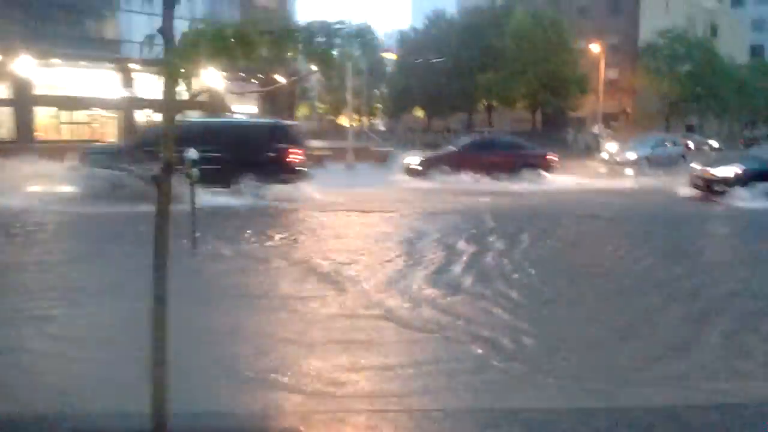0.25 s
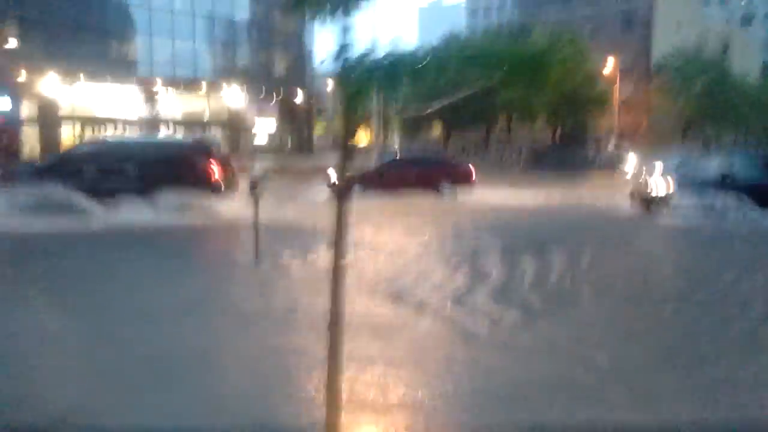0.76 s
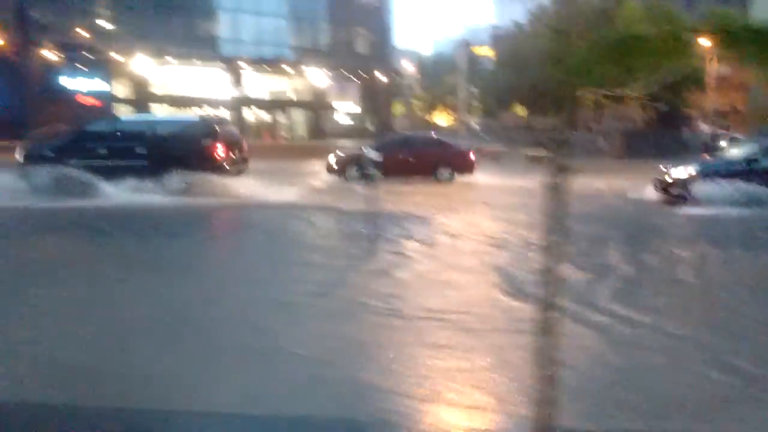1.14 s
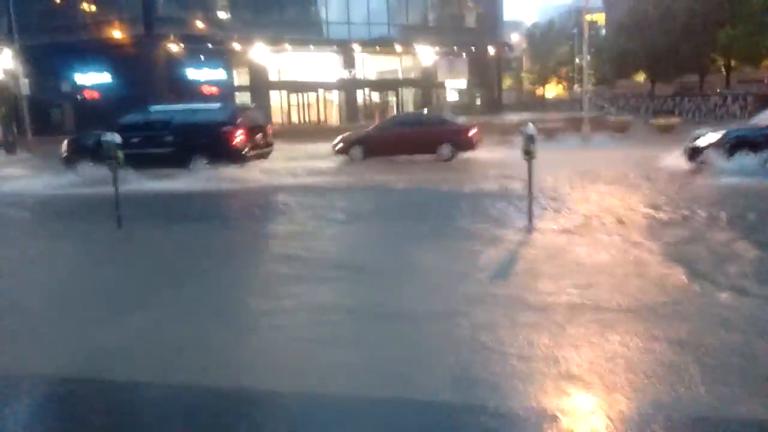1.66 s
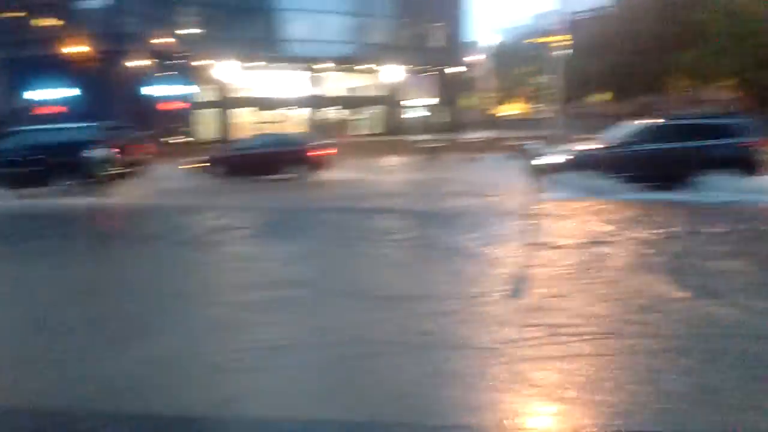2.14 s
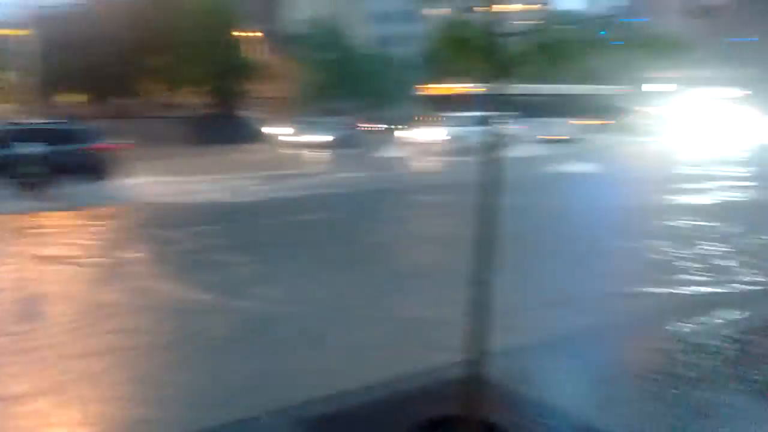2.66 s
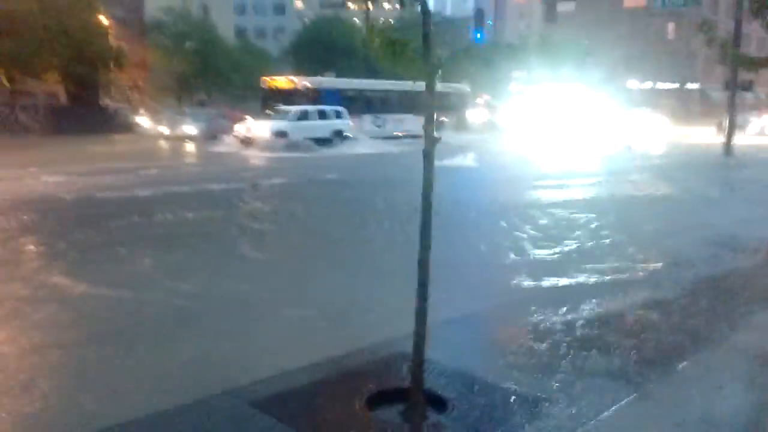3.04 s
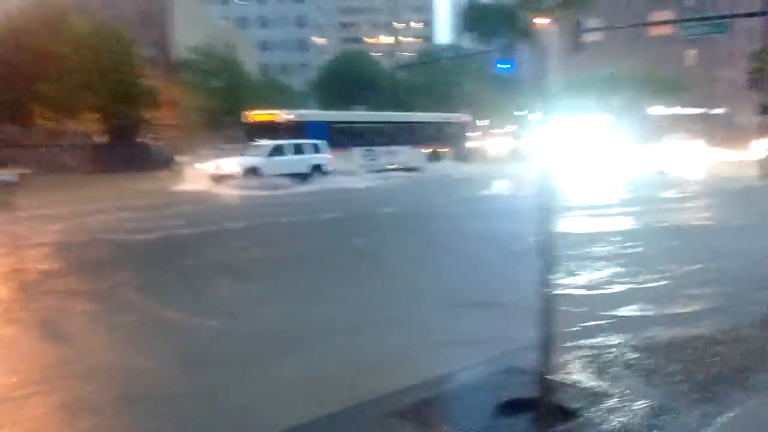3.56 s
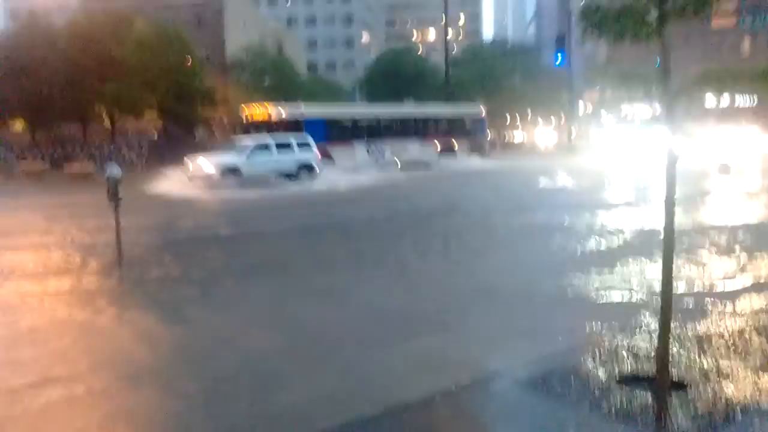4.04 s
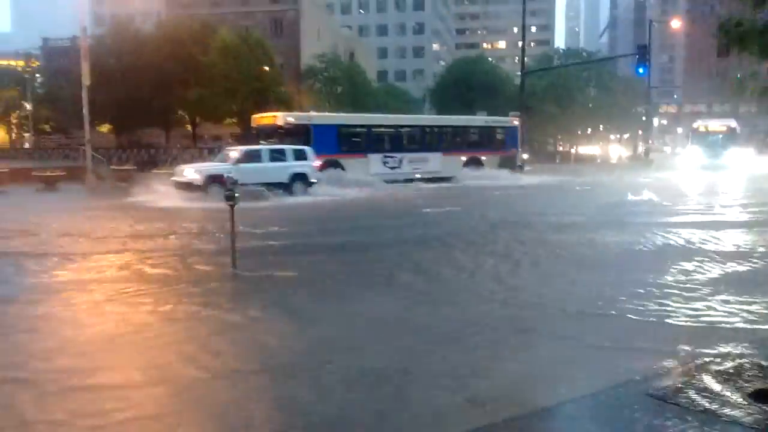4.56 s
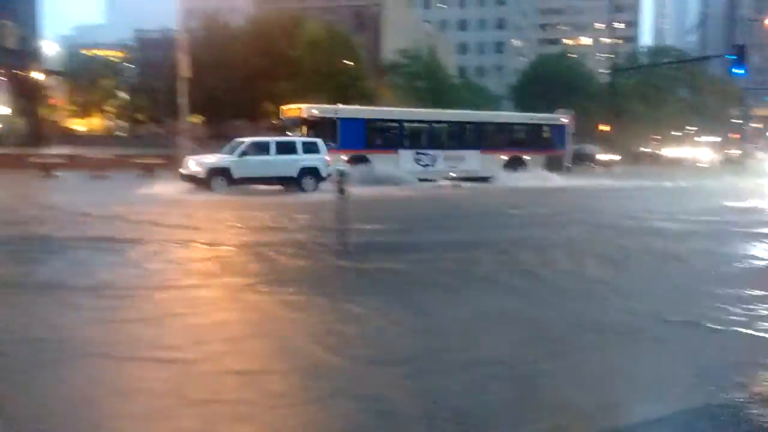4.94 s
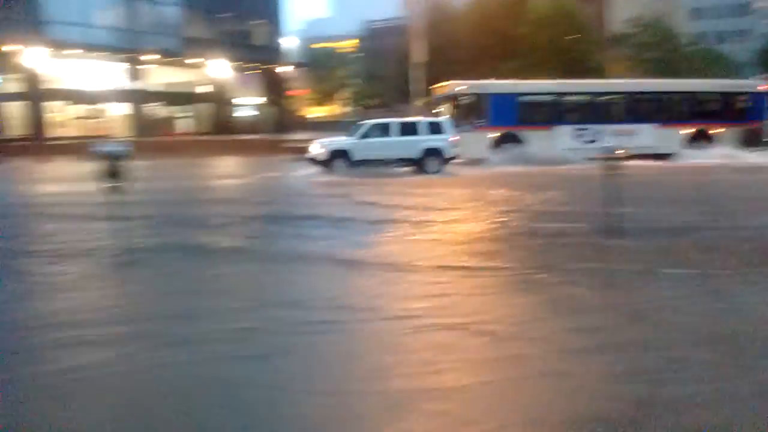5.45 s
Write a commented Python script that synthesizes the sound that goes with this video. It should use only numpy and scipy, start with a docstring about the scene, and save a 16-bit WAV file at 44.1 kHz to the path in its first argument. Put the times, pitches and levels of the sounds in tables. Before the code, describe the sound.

Heavy rain hisses and bubbles over a flooded city street as cars push through the water, engines droning low and big drops ticking close by.

```python
"""Heavy rain hisses and bubbles on a flooded street, swelling as cars shove through the water; low engines drone
and big drops tick close by. Rain is random impulses, hiss and ringing bubbles; wash and rumble are shaped noise;
engines are wavering sine pairs; thumps and ticks are dying sines. A handheld recorder hears it through a port
at each end, the right one wired in reverse; its gain control ducks on loud peaks and creeps back."""
import sys
import numpy as np
from scipy import signal
from scipy.fft import rfft, irfft, next_fast_len
from scipy.io import wavfile
from scipy.ndimage import minimum_filter1d

SR = 44100
rng = np.random.default_rng(int(sys.argv[2]) if len(sys.argv) > 2 else 0)


def unload_audio(sound):
    """Save the sound as a 16-bit wav file, at the path given as the first command line argument."""
    columns = np.transpose(np.atleast_2d(sound))
    # keep every value between -1 and 1, then stretch to whole-number steps
    steps = np.round(np.clip(columns, -1, 1) * 32767)
    wavfile.write(sys.argv[1], SR, steps.astype(np.int16))


N = 250929
SIZE = next_fast_len(N + 4096)
HZ = np.maximum(np.arange(SIZE // 2 + 1) * SR / SIZE, 1)
PORT_LAG_S = 0.000323   # sound travel from one end of the recorder to the other


def from_db(db):
    """Gain of a level in dB."""
    return 10 ** (np.asarray(db) / 20)


def rms_one(x):
    """x scaled to rms 1."""
    return x / np.sqrt(np.mean(x ** 2) + 1e-20)


def in_time(rows):
    """Columns of a time table, one value a sample."""
    s, *columns = np.transpose(rows)
    return [np.interp(np.arange(N) / SR, s, column) for column in columns]


def over_hz(rows):
    """Columns of a frequency table, one value a bin, interpolated over log frequency."""
    hz, *columns = np.transpose(rows)
    return [np.interp(np.log(HZ), np.log(hz), column) for column in columns]


def filtered(x, response):
    """x through a frequency response."""
    return irfft(rfft(x, SIZE) * response, SIZE)[..., :N]


def drift(rate_hz):
    """Slow random curve of rms 1: noise through two equal poles at rate_hz."""
    step = 40   # samples between drawn points
    r = np.exp(-2 * np.pi * rate_hz * step / SR)
    noise = rng.standard_normal(N // step + 2002)
    slow = signal.lfilter([1], [1, -2 * r, r * r], noise)[2000:]   # settled part
    return np.interp(np.arange(N) / step, np.arange(len(slow)), rms_one(slow))


def flickering(white, edges_hz, patchy_db, rate_hz):
    """Each band between the edges wavers in level on its own; above the last edge the noise is steady."""
    out = filtered(white, HZ > edges_hz[-1])
    for low_hz, high_hz in zip(edges_hz, edges_hz[1:]):
        band = filtered(white, (HZ > low_hz) & (HZ <= high_hz))
        out += from_db(patchy_db * drift(rate_hz)) * band
    return out


def ring(t, hz, t60_s):
    """Sine that starts at t = 0 and dies by 60 dB in t60_s (at least 1 ms)."""
    decay_db = -60 * np.maximum(t, 0) / max(t60_s, 1e-3)
    return (t > 0) * np.sin(2 * np.pi * hz * t) * from_db(decay_db)


def ports(x, lead):
    """Left and inverted right pick-up; lead 1 reaches the left end first, -1 the right end, 0 both at once."""
    # right port against the left: (frequency [Hz], level [dB])
    right_against_left = [(30, -1.5), (120, -.85), (220, -.25), (350, -.5), (500, -.6), (700, 2.5),
                          (950, -2), (1250, -2.6), (1900, -.2), (2300, .1), (2700, -4.5), (5000, -5),
                          (7200, -3), (9300, -.7), (10300, -1.5), (11800, -12), (13000, -13), (15000, -5)]
    turn = np.exp(1j * np.pi * HZ * PORT_LAG_S * lead)   # half the lag on each side
    return filtered(x, np.array([turn, -from_db(over_hz(right_against_left)[0]) / turn]))


def drop_sizes(spread_db):
    """Uneven drop sizes, exponential in dB, capped at five spreads."""
    return from_db(spread_db * np.minimum(rng.exponential(1, N), 5))


def bubbles(low_hz, high_hz):
    """Some drops trap air that rings at one of 24 pitches; even level per Hz across the range."""
    per_s, spread_db, cycles_to_60_db, pitches = 900, 3.64, 15.6, 24
    hits = drop_sizes(spread_db) * (rng.random(N) < per_s / SR)
    dealt, out = rng.integers(0, pitches, N), 0
    for k, hz in enumerate(np.geomspace(low_hz, high_hz, pitches)):
        r = from_db(-60 * hz / (cycles_to_60_db * SR))
        w = 2 * np.pi * hz / SR
        rung = signal.lfilter([0, np.sin(w)], [1, -2 * r * np.cos(w), r * r], hits * (dealt == k) + 1e-18)
        out = out + hz * rung
    return rms_one(out) * np.sqrt(2 * (high_hz - low_hz) / SR)   # density of unit white noise


def splashes():
    """Single drops of uneven size and their bubbles over the far hiss, flickering by octave."""
    drops_per_s, spread_db, far_share = 1600.0, 2.0, 0.84
    bubble_low_hz, bubble_high_hz, bubble_share = 557, 2680, 0.13   # shares are of power
    impulses = drop_sizes(spread_db) * rng.choice([-1, 1], N)
    near = rms_one(impulses * (rng.random(N) < drops_per_s / SR))
    white = np.sqrt(1 - far_share) * near + np.sqrt(far_share) * rng.standard_normal(N)
    inside = (HZ > bubble_low_hz) & (HZ < bubble_high_hz)
    white = filtered(white, np.sqrt(1 - bubble_share * inside))
    white += np.sqrt(bubble_share) * bubbles(bubble_low_hz, bubble_high_hz)
    return flickering(white, [0, 700, 1400, 2800, 5600, 11200], patchy_db=1.07, rate_hz=15.0)


def rain():
    """Splashes arrive from both ends of the recorder, plus a scattered part each port hears by itself."""
    # rain, swelling as cars shove through the water: (time [s], rms level at left port [dB])
    swell = [(0, -18), (.15, -19), (.4, -21), (.7, -23), (1.0, -23.5), (1.3, -24.5), (1.6, -25.5),
             (1.9, -26), (2.3, -20.5), (2.55, -20), (2.8, -20.5), (3.2, -20), (3.8, -22.5), (4.3, -20),
             (4.7, -21), (5.0, -21.5), (5.4, -22.5), (5.7, -23)]
    # rain's treble gain before the level is set: (time [s], level [dB])
    treble_gain = [(0, 1), (.7, 1.1), (1.2, 3), (1.8, 1.5), (2.5, -1.5), (3.2, -2), (4.2, -2), (5.0, -3.5),
                   (5.7, -3.5)]
    # colour at the left port: (frequency [Hz], level [dB])
    colour_rows = [(150, -32), (250, -14), (370, -7.5), (500, -7), (700, -3), (900, 0.1), (1500, 0.1),
                   (2000, -2), (3000, -6), (4200, -10), (5800, -16.5), (8200, -17), (10200, -21),
                   (11500, -24.5), (13000, -26.5), (14600, -29.5), (15200, -33), (15600, -60), (20000, -70)]
    # where rain comes from: (frequency [Hz], left-end share of the unscattered [0-1], scattered share [0-1])
    arrival = [(407, 0.1, 0.82), (637, 1, 0.21), (880, 0.93, 0.04), (1710, 1, 0.05), (2700, 0.83, 0.15),
               (3450, 0.77, 0.26), (3900, 0.23, 0.22), (5600, 1, 0.53), (6600, 1, 0.12), (8460, 1, 0.4),
               (9600, 1, 0), (9700, 0, 0.67), (10900, 0.3, 0), (11500, 1, 0.7)]
    colour = from_db(over_hz(colour_rows)[0])
    left_end, scattered = over_hz(arrival)
    shares = [(1 - scattered) * left_end, (1 - scattered) * (1 - left_end), scattered, scattered]
    left, right, own_left, own_right = [filtered(splashes(), colour * np.sqrt(share)) for share in shares]
    heard = ports(left, 0.99) + ports(right, -1.045)
    heard += [ports(own_left, 0)[0], ports(own_right, 0)[1]]
    treble = filtered(heard, HZ ** 2 / (HZ ** 2 + 1950.0 ** 2))
    heard += (from_db(in_time(treble_gain)[0]) - 1) * treble
    level_db = in_time(swell)[0] + 0.5 * drift(0.19)
    return from_db(level_db) * heard / np.std(heard[0])


def wash():
    """Low lumpy rush of wheels through the water: two streams of band noise around the middle."""
    # wheel wash: (time [s], level [dB])
    wash_level = [(0, -40), (1.0, -34), (1.5, -38), (2.1, -39), (2.8, -38), (4.3, -40.5), (5.0, -51),
                  (5.7, -46)]
    band = signal.butter(2, [260.0, 650.0], "band", fs=SR, output="sos")
    rush = sum(ports(signal.sosfilt(band, rng.standard_normal(N)), lead) for lead in (0.6, -0.4))
    return from_db(in_time(wash_level)[0] + 0.85 * drift(9.0)) * rms_one(rush)


def rumble():
    """Traffic rumble: two streams of coloured low noise, patchy by band and lumpy overall."""
    # traffic rumble: (time [s], level [dB])
    rumble_level = [(0, -15), (.7, -17), (1.2, -19), (1.6, -21.5), (1.9, -20.5), (2.15, -15.5), (2.5, -15),
                    (3.0, -17.5), (3.6, -20), (4.3, -16), (5.0, -18.5), (5.7, -23.5)]
    # colour at the left port: (frequency [Hz], level [dB])
    colour_rows = [(10, -40), (30, -15), (40, -8.5), (52, -6.5), (65, -7), (85, -3), (120, -.5), (150, 0.5),
                   (210, -.5), (260, -5), (340, -10.5), (500, -12), (700, -19), (1300, -40), (6000, -48),
                   (12000, -75)]
    colour = from_db(over_hz(colour_rows)[0])
    edges_hz = [0, 60, 90, 130, 180, 250, 350, 500, SR]
    heard = 0
    for lead in (0.25, -0.1):
        side = flickering(rng.standard_normal(N), edges_hz, patchy_db=3.8, rate_hz=7.0)
        heard = heard + ports(filtered(side, colour), lead)
    return from_db(in_time(rumble_level)[0] + 2.44 * drift(22.0)) * rms_one(heard)


def engines():
    """Three drones: a sine at the firing rate and its octave, wavering in pitch and level."""
    # one table an engine: (time [s], mean firing rate [Hz], level [dB])
    drones = [
        [(0, 42, -28), (.3, 36.5, -27), (.8, 40, -30), (1.3, 43, -31), (1.9, 46, -37), (2.5, 42, -39),
         (3.2, 40, -45)],
        [(0, 85, -48), (.6, 91, -37), (1.2, 99, -33), (1.7, 111, -37), (2.0, 104, -31), (2.3, 88, -33),
         (2.7, 85, -50)],
        [(3.6, 89.4, -56.5), (3.9, 91.2, -33), (4.3, 84, -26), (4.6, 78.5, -21.5), (4.9, 74.5, -28),
         (5.2, 72, -31), (5.7, 70.4, -36)],
    ]
    # second order against the first, one an engine: [dB]
    second_order_db = [-10, -14, -10]
    out = np.zeros(N)
    for rows, second_db in zip(drones, second_order_db):
        hz, level_db = in_time(rows)
        phase = 2 * np.pi * np.cumsum(hz * (1 + 0.0426 * drift(6.3))) / SR
        level_db = level_db + 4.0 * drift(8.0)
        out += from_db(level_db) * (np.sin(phase) + from_db(second_db) * np.sin(2 * phase))
    return ports(out, 0.15)


def ticks():
    """Each big drop cracks, thuds and rings two short modes of the housing; the right port hears it first."""
    # big drops on the recorder: (time [s], level [dB], low ring [Hz], low ring t60 [s],
    # high ring [dB], high ring [Hz], high ring t60 [s], crack [dB], thud [dB], thud [Hz],
    # left port against right [dB]); ring, crack and thud levels are against the low ring
    drops = [(0.7246, 12.5, 3410, 0.002, -3, 4300, 0.0013, -7, -8, 1900, 0.5),
             (.9095, -10, 2500, .003, -6, 3715, .003, -4, -20.5, 566, 0),
             (0.9152, 7, 1920, 0.0053, -1, 3900, 0.0028, -1.5, -6, 1100, -1),
             (0.9399, 7, 1940, 0.0061, -7, 3715, 0.0022, -14, 4, 1050, -4),
             (2.2432, -5.5, 1770, .009, -7.5, 4150, 0.0046, -38, -4, 1000, 0.5),
             (2.9602, 9, 1845, 0.0046, -4.5, 3900, 0.0018, -15.5, -17, 700, -1),
             (4.3971, 3, 2060, 0.0047, 0.5, 3750, 0.0044, -12, -8, 500, -5),
             (4.6002, 15.5, 1570, 0.0024, -12.5, 4140, 0.0042, -17, -10, 654, -1),
             (5.42755, 4, 2525, 0.0027, -1.5, 3880, 0.0026, -14, -19, 700, -0.5)]
    thud_cycles_to_60_db = 1.8
    out = np.zeros((2, N))
    for (s, level_db, low_hz, low_t60_s, high_db, high_hz, high_t60_s,
         crack_db, thud_db, thud_hz, left_db) in drops:
        at = slice(int(s * SR) - 20, int(s * SR) + 900)
        for side, (lag_s, port_db, sign) in enumerate([(PORT_LAG_S, left_db, -1), (0, 0, 1)]):
            t = np.arange(N)[at] / SR - s - lag_s
            tick = ring(t, low_hz, low_t60_s) + from_db(high_db) * ring(t, high_hz, high_t60_s)
            tick += from_db(thud_db) * ring(t, thud_hz, thud_cycles_to_60_db / thud_hz)
            tick *= np.clip(t / 0.00026, 0, 1)   # a drop lands softly
            crack = ring(t, 8330.0, 0.0012) * np.clip(t / 0.00007, 0, 1)
            tick += from_db(crack_db + min(6.4 * port_db, 0)) * crack   # weaker still at a quieter left port
            out[side, at] += sign * from_db(level_db + port_db) * tick
    return out


def thumps():
    """Low thumps among the traffic: softly started sines that die fast."""
    # thumps: (time [s], level [dB], frequency [Hz], t60 [s])
    thump_rows = [(2.089, 1, 160, 0.047), (2.108, -4, 154, 0.082), (2.276, 2.5, 167, 0.035),
                  (2.395, 2, 150, 0.019), (2.808, -4, 148, 0.074)]
    out = np.zeros(N)
    for s, level_db, hz, t60_s in thump_rows:
        at = slice(int(s * SR), int(s * SR) + SR // 4)
        t = np.arange(N)[at] / SR - s
        out[at] += from_db(level_db) * ring(t, hz, t60_s) * np.clip(t / 0.0013, 0, 1)
    return ports(out, 0.15)


def scene():
    """All sources as the two ports hear them."""
    return rain() + wash() + rumble() + engines() + ticks() + thumps()


def record(dry):
    """Gain control, less sensitive to bass, ducks on peaks, holds and recovers; then clipping and a top cut."""
    ceiling_db, start_duck_db, recovery_db_per_s = -6.5, 9.5, 15.5
    hold_s, smoothing_s, sensor_low_cut_hz = 0.19, 0.0011, 700
    clip_level, cutoff_hz = 0.95, 16500
    sensed = signal.lfilter(*signal.butter(1, sensor_low_cut_hz, "high", fs=SR), dry)
    over_db = 20 * np.log10(np.abs(sensed).max(axis=0) + 1e-9) - ceiling_db
    hold = int(hold_s * SR)
    padded = np.pad(over_db, (hold, 0), constant_values=-99)
    held_db = -minimum_filter1d(-padded, size=hold, origin=(hold - 1) // 2)[hold:]   # running maximum
    climb_db = recovery_db_per_s * np.arange(N) / SR
    # the highest peak so far, less the recovery since
    reached_db = np.maximum.accumulate(np.maximum(held_db + climb_db, start_duck_db))
    duck_db = np.maximum(reached_db - climb_db, 0)
    r = np.exp(-1 / (smoothing_s * SR))
    duck_db = signal.lfilter([1 - r], [1, -r], duck_db, zi=[r * duck_db[0]])[0]
    loud = dry * from_db(-duck_db)
    passed = np.clip((cutoff_hz - HZ) / 500, 0, 1)
    for stage in range(3):   # each stage clips, then cuts the top
        loud = filtered(np.clip(loud, -clip_level, clip_level), passed)
    return loud


dry = scene()
out = record(dry)
unload_audio(out)
```